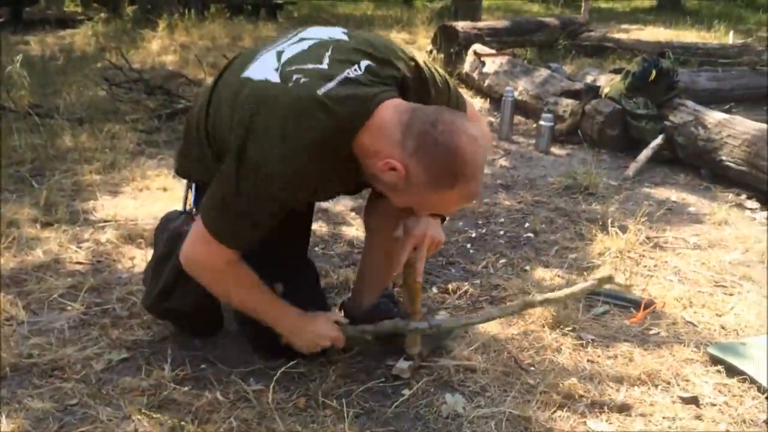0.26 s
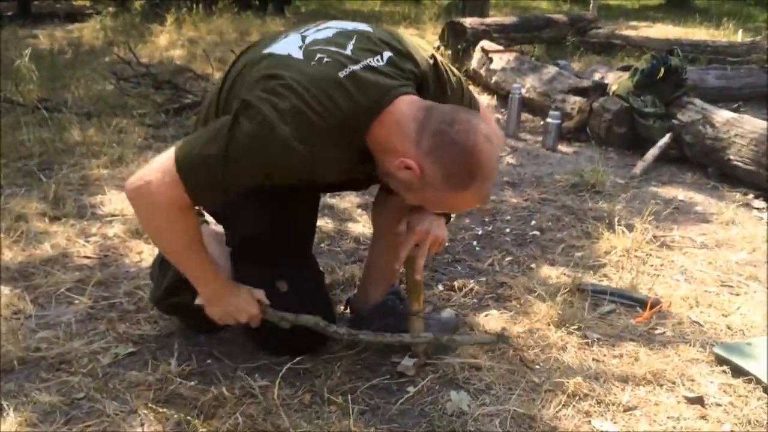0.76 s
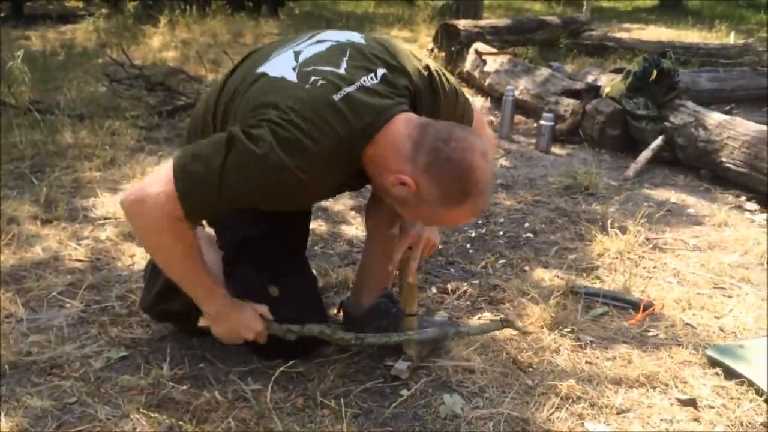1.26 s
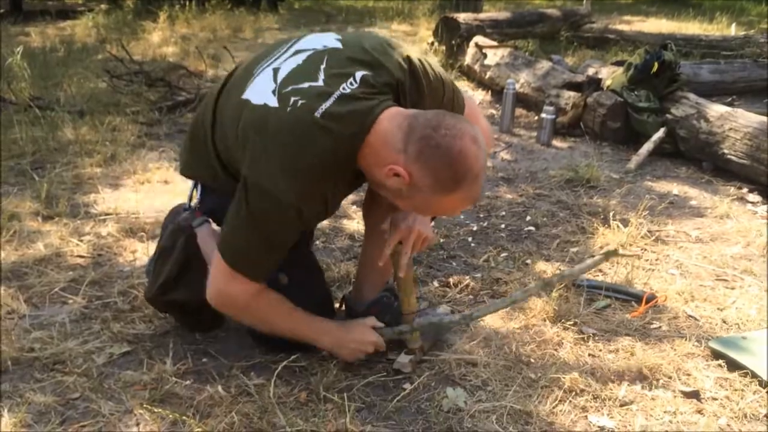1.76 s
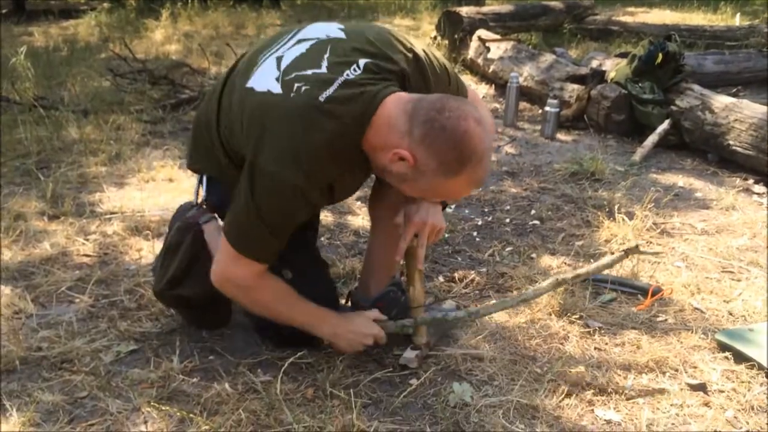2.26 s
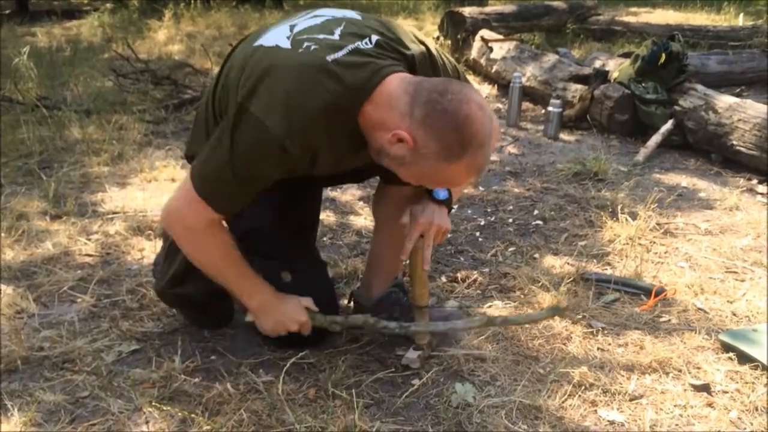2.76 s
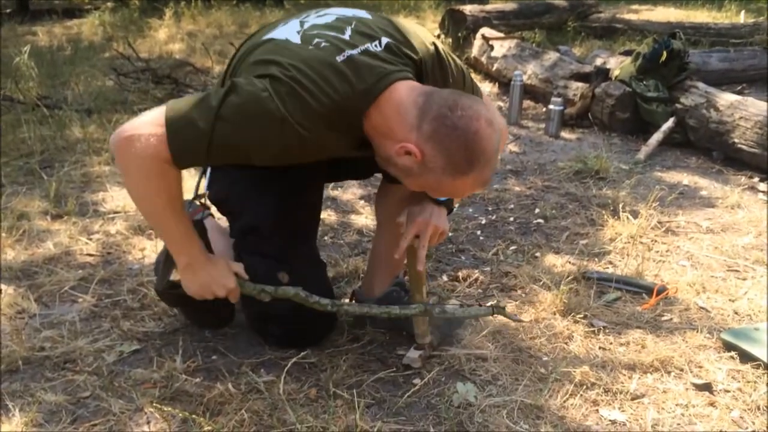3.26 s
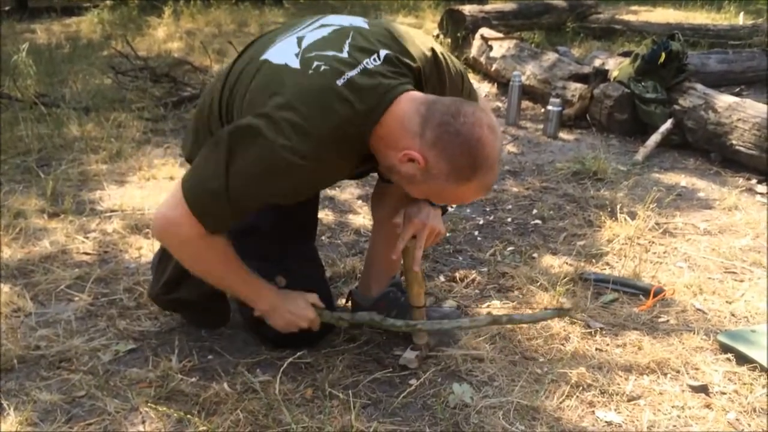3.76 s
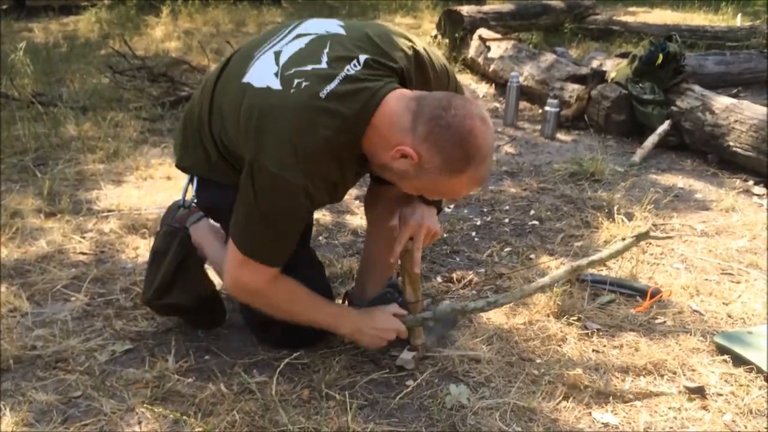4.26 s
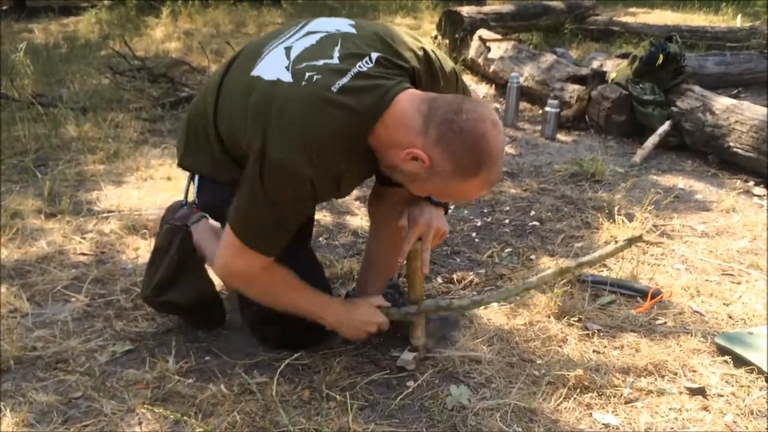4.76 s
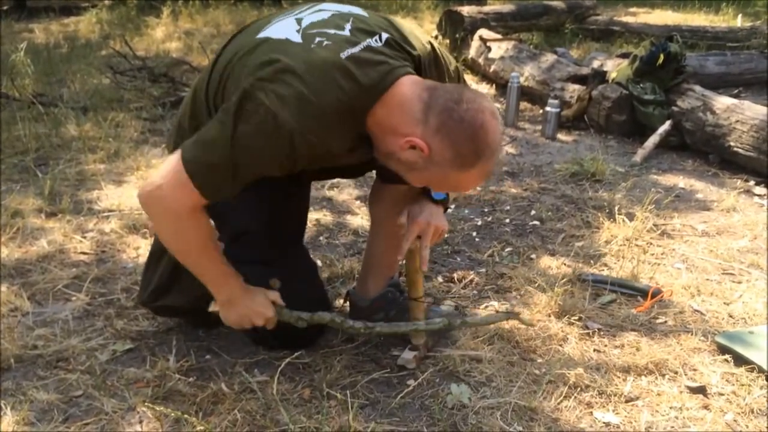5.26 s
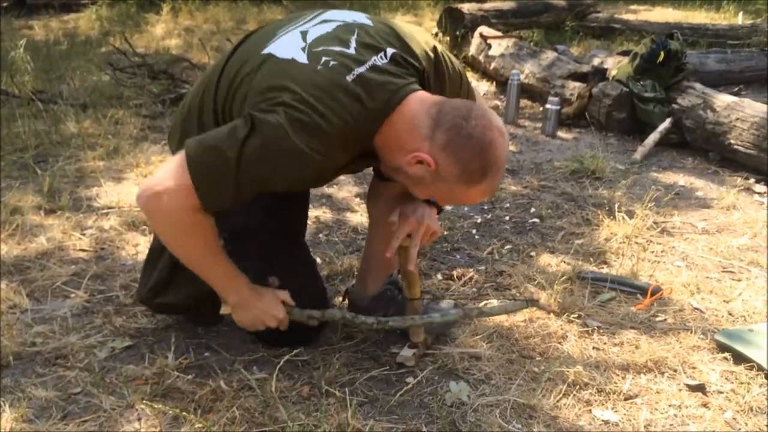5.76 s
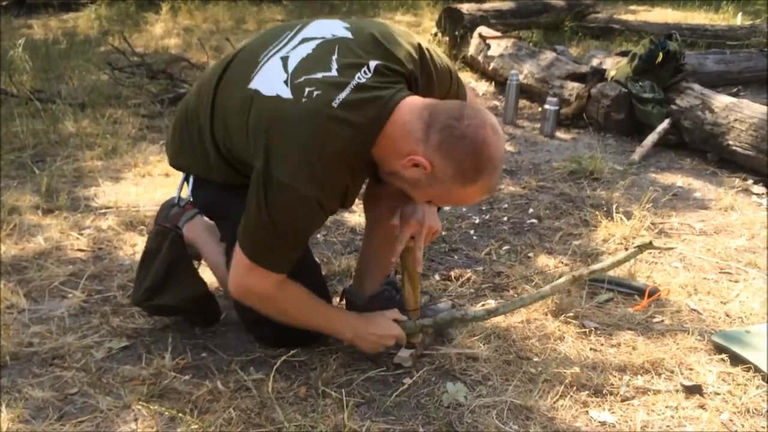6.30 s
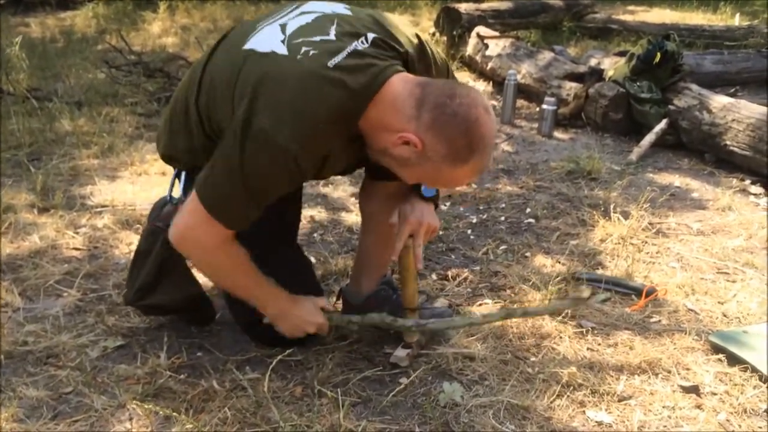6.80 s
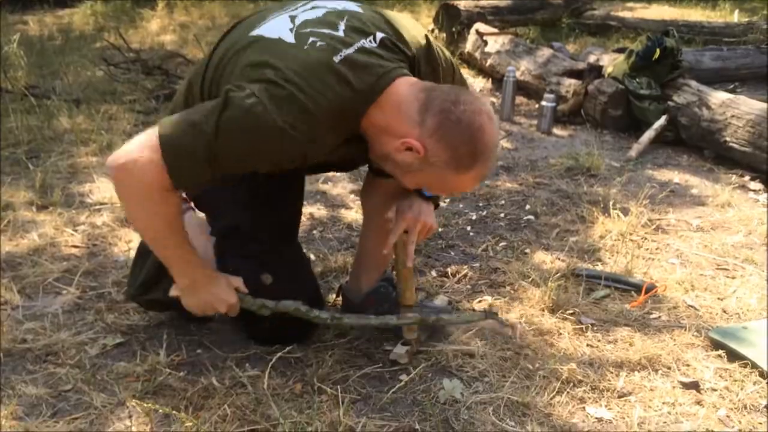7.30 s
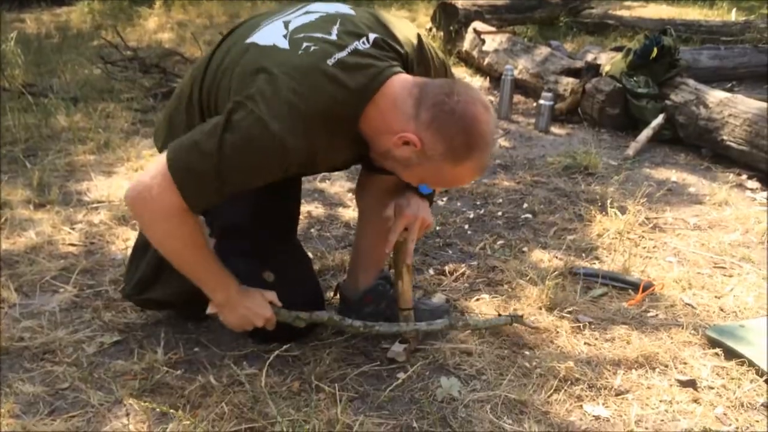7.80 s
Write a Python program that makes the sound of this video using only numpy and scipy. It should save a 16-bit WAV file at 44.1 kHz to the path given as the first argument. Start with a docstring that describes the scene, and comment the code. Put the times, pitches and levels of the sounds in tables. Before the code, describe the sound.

Fast, steady bow-drill strokes rub dry wood on wood, giving harsh short squeaks, gritty rasping and dull socket knocks in a quiet outdoor clearing.

```python
"""Wood grinds and squeaks in quick back-and-forth strokes: a bow drill is worked on dry ground outdoors.
Each stroke spins a wooden spindle in the socket of a hearth board; random fibre slips grind and ring the wood.
Where it grips, short stick-slip tones squeak and turn harsh, and rough squeals sound on higher modes.
Ringing modes make the knocks in the socket; short noise bursts make the ticks of dry wood.
The strokes stop just before the end, leaving soft air noise and a low distant hum."""
import sys
import numpy as np
from scipy import signal
from scipy.fft import rfft, irfft
from scipy.io import wavfile
from scipy.ndimage import uniform_filter1d, minimum_filter1d

SR = 44100
rng = np.random.default_rng(int(sys.argv[2]) if len(sys.argv) > 2 else 0)


def to_wav(s):
    """Save 16-bit WAV."""
    ch = np.atleast_2d(s).T  # columns
    pcm = np.round(np.clip(ch, -1, 1) * 32767)  # PCM
    wavfile.write(sys.argv[1], SR, pcm.astype(np.int16))


N = 354606
TIME = np.arange(N) / SR

# bow strokes, pull and push in turn, each lasting until the next; the level is before the grit boost:
# (start [s], grinding level [dB])
BOW_STROKES = [(-0.04, -43.5), (0.142, -41.5), (0.338, -43), (0.545, -41.5), (0.748, -46.5), (0.955, -43.5),
               (1.147, -50), (1.362, -42), (1.558, -45), (1.769, -43.5), (1.965, -43.5), (2.171, -43.5),
               (2.378, -44.5), (2.604, -44), (2.803, -40), (3.014, -43.5), (3.203, -40.5), (3.411, -43.5),
               (3.61, -43), (3.826, -41), (4.028, -44), (4.246, -43), (4.442, -44.5), (4.672, -38.5),
               (4.863, -44.5), (5.085, -42), (5.272, -43), (5.476, -43.5), (5.671, -43.5), (5.864, -44),
               (6.065, -45.5), (6.281, -44.5), (6.463, -42.5), (6.674, -45.5), (6.862, -43), (7.058, -47.5),
               (7.242, -45), (7.46, -49), (7.552, -52.5), (7.665, -49.5)]
# the spindle grips and squeaks; length is at half height, overtones are relative to the squeak:
# (middle [s], level [dB], length [s], rough pitch [Hz], overtones before trim [dB])
GRIPPING_SQUEAKS = [(0.075, -23.5, 0.0041, 1035, 5), (0.219, -18, .016, 1075, -21.5),
                    (0.251, -15, .011, 1158, -8.5), (0.263, -9.5, 0.0097, 1036, -4.5),
                    (0.279, -17.5, .023, 1099, -8.5), (0.404, -34, .026, 971, -8),
                    (0.661, -14.5, 0.016, 1074, -9), (0.675, -13.5, .01, 1022, -8),
                    (0.683, -10, .011, 1133, -7.5), (0.707, -23.5, .018, 1135, -18),
                    (0.798, -15.5, 0.016, 1025, -3.5), (0.849, -18, .013, 1050, -4.5),
                    (1.019, -20, .017, 1105, -15.5), (1.035, -5.5, 0.0045, 1079, -9),
                    (1.047, -9.5, 0.018, 1110, -5), (1.061, -9.5, .009, 1067, -5),
                    (1.078, -18.5, 0.017, 1097, -7), (1.194, -19.5, .011, 1045, -15.5),
                    (1.225, -33, .012, 787, -2), (1.248, -30, 0.013, 986, 2.5), (1.272, -35, .012, 774, -1),
                    (1.459, -12.5, 0.012, 1159, -8), (1.471, -10.5, 0.0092, 1030, 1),
                    (1.492, -12.5, .013, 1107, -6.5), (1.515, -18, .018, 1105, -14),
                    (1.858, -21.5, .017, 1074, -25), (2.063, -21.5, 0.026, 1042, -2),
                    (2.279, -30.5, .016, 1077, -3), (2.429, -23.5, .015, 1006, -30),
                    (2.458, -18.5, .01, 915, -0.5), (2.485, -21, 0.012, 942, 2),
                    (2.511, -27.5, 0.0085, 1023, -7.5), (2.853, -19, .012, 903.4, -0.5),
                    (2.875, -20, .013, 933, -13.5), (2.901, -18, .02, 983, 1.5),
                    (2.922, -19, 0.0093, 1074, 2), (2.972, -21, .014, 1070, -10),
                    (2.987, -25, .013, 1085, -11), (3.103, -22, .007, 1009, -9.5),
                    (3.683, -26, .013, 898.6, -10), (3.72, -21.5, 0.015, 991, 0.5),
                    (3.738, -19.5, 0.018, 952, 2.5), (4.089, -34, .016, 816.4, -18),
                    (4.146, -19.5, .015, 928, 2), (4.334, -26, .014, 1060, -16),
                    (4.357, -23, .012, 1071, -25.5), (4.485, -28.5, .02, 922, -9),
                    (4.501, -12, .009, 934, -2), (4.793, -12, 0.019, 1129, -12),
                    (4.81, -10.5, .007, 1138, -6), (4.923, -24, .012, 1027, -16.5),
                    (4.951, -19, 0.0041, 1028, -20), (4.976, -19.5, 0.019, 1005, 0),
                    (5.436, -27, 0.023, 1185, -25.5), (5.607, -19.5, .024, 1150, -17.5),
                    (5.63, -17.5, 0.013, 1078, -7.5), (5.726, -12.5, .012, 955, 3.5),
                    (5.787, -22, .011, 1031, 3), (5.959, -26, .028, 1205, -7),
                    (5.975, -16.5, .012, 1102, -9.5), (6.112, -13.5, .013, 1073, -1.5),
                    (6.165, -24.5, .022, 969, .5), (6.186, -23.5, .014, 959, 2),
                    (6.233, -27, .017, 1125, -13.5), (6.362, -17.5, .015, 1210, -9),
                    (6.38, -21.5, 0.021, 1060, -6), (6.402, -22.5, 0.0098, 1125, -10.5),
                    (6.524, -14.5, .011, 893, 1.5), (6.545, -23.5, .011, 970, -19),
                    (6.579, -20, 0.023, 950, 0.5), (6.65, -20.5, .01, 1142, -7.5),
                    (6.903, -20.5, 0.0069, 871, -3.5), (6.94, -17, 0.0093, 936, 5),
                    (6.956, -22, .011, 990, 4.5), (6.983, -22.5, 0.013, 858.4, 1),
                    (7.007, -23.5, .018, 1000, 2.5), (7.313, -14, 0.011, 1028, -7.5),
                    (7.334, -27, .022, 937, -16), (7.386, -23.5, 0.029, 1030, 0),
                    (7.423, -10.5, 0.0084, 1153, -5.5), (7.774, -27.5, 0.0061, 952, -10)]
# brief squeals on the upper modes of the spindle: (middle [s], level [dB], length at half height [s], pitch [Hz])
UPPER_SQUEALS = [(0.265, -19, .0066, 3080), (0.425, -29, .012, 2930), (1.059, -19, .007, 3040),
                 (1.43, -29.5, .014, 2614), (1.659, -28, .012, 2500), (2.061, -17, 0.0083, 2000),
                 (2.917, -15.5, 0.0068, 2720), (3.346, -28, .016, 2600), (3.537, -24.5, .011, 2500),
                 (3.732, -14.5, .0056, 2500), (5.813, -25, .016, 2470), (6.181, -19, .014, 1850),
                 (6.958, -9, .0051, 2355), (7.185, -29.5, .012, 2600), (7.397, -11.5, 0.0019, 2350),
                 (7.593, -27.5, .013, 2530)]
# the spindle jumps in its socket; levels drive the modes below: (time [s], clack [dB], thud [dB])
SPINDLE_KNOCKS = [(0.1, -21, -24.5), (0.275, -36, -27), (0.498, -23.5, -49), (0.685, -43, -24.5),
                  (0.821, -37, -29), (1.084, -42, -27), (2.033, -24.5, -26), (2.115, -13, -28),
                  (2.2, -32, -28), (2.289, -23, -28.5), (2.313, -22, -25), (2.484, -11, -31),
                  (2.691, -26, -26), (2.74, -37, -28.5), (2.896, -26, -34), (3.143, -34.5, -27),
                  (3.361, -21, -29), (3.442, -16.5, -22), (3.549, -23.5, -21), (3.559, -17, -21),
                  (3.707, -18.5, -29.5), (3.768, -16, -25.5), (4.121, -23.5, -23.5), (4.368, -28, -26),
                  (4.552, -39, -45), (5.356, -23, -35), (5.993, -25, -20.5), (6.391, -21.5, -20.5),
                  (6.554, -29, -30), (6.794, -27, -27.5), (6.997, -21, -39), (7.178, -32.5, -29.5),
                  (7.428, -15, -25), (7.495, -40, -31.5)]
# sharp ticks of dry wood: (time [s], starting level [dB])
DRY_TICKS = [(1.701, -32.5), (1.755, -31), (2.996, -27), (4.223, -32), (4.976, -29), (6.607, -32.5),
             (7.856, -38.5)]
# resonances of the rubbed spindle and board; the filter widens each by pi/2:
# (centre [Hz], nominal width [Hz], relative level [dB])
WOOD_RESONANCES = [(1105, 241, -2), (2510, 227, -2.5), (2770, 330, -11), (3670, 230, -18.5),
                   (4560, 230, -14.5), (7170, 570, -29.5), (9860, 450, -35)]
# modes of the struck board: (frequency [Hz], relative level [dB], time to fall 60 dB [s])
BOARD_MODES = [(558, -8.5, 0.034), (720, -3, 0.034), (1307, 3.5, 0.013), (1574, 1.5, 0.0055),
               (2720, -7, 0.016)]
# modes of the board on the soil: (frequency [Hz], relative level [dB], time to fall 60 dB [s])
SOIL_MODES = [(104, -13, 0.11), (160.2, -5, 0.083), (209.6, -4, 0.037), (306, -9.5, 0.028)]
# tone colour of the grinding: (frequency [Hz], relative level [dB])
GRIND_SPECTRUM = [(25, -15), (50, 0.5), (190, 5.5), (400, -3.5), (700, 5), (1100, -3), (1600, 4.5),
                  (2600, 1.5), (3400, -0.5), (4600, 0), (5600, -10.5), (7200, -19), (8600, -28),
                  (10000, -27), (12000, -38), (15500, -37)]
# tone colour of the outdoor air: (frequency [Hz], relative level [dB])
AIR_SPECTRUM = [(25, -23), (55, 1), (130, 0), (200, -2), (280, -11), (500, -11), (1100, -15), (2400, -14),
                (4500, -25), (9000, -35), (15000, -42)]
# how strongly the wood radiates the overtones of a squeak: (frequency [Hz], relative level [dB])
OVERTONE_RADIATION = [(1500, 1), (1900, -0.5), (2400, 0), (2800, -9.5), (3300, -19), (4500, -20),
                      (5300, -34.5), (7000, -51)]
# tone colour of a dry tick: (frequency [Hz], relative level [dB])
TICK_SPECTRUM = [(300, -12), (1500, -3), (4000, 0), (7000, -13), (15000, -26)]

STOP_S = 7.877   # the last stroke ends
PULL_FASTEST, PUSH_FASTEST = 0.53, 0.45   # share of the stroke at which the bow is fastest
USUAL_GRIND_DB = -43
# ring of the wood in a usual stroke, and the share of the grinding's swing that it follows
PULL_RING_DB, PUSH_RING_DB, RING_FOLLOWS = -37, -37.5, 0.82
# average change of pitch over the length of a squeak, and its random spread
PULL_GLIDE_HZ, PUSH_GLIDE_HZ, GLIDE_SPREAD_HZ = -34.5, 70.7, 90
CHIRP_OVER_GRIND_DB, CHIRP_SPREAD_DB, CHIRP_OVERTONES_DB = 7.0, 1.5, -3.0
CHIRP_LENGTH_S, CHIRP_REACH = .016, .27   # reach: share of the stroke on either side of its middle
PULL_CHIRP_HZ, PUSH_CHIRP_HZ = 1001, 1089.6   # average pitch mid-stroke
CHIRP_CLIMB_HZ, CHIRP_SCATTER_HZ = 199.8, 59.95   # climb per whole stroke, and random spread
AIR_DB, HUM_HZ, HUM_DB = -56, 95.6, -52.5
CUTOFF_HZ = 15500


def from_db(db):
    """Turn decibels into a gain."""
    return 10 ** (np.asarray(db) / 20)


def rms_one(x):
    """Scale a sound to unit power."""
    return x / np.sqrt(np.mean(x ** 2) + 1e-20)


def drift(rate):
    """Smooth random wandering of spread 1; a higher rate [Hz] wanders faster."""
    r = np.exp(-2 * np.pi * rate / SR)
    noise = rng.standard_normal(N + SR)
    return rms_one(signal.lfilter([1], [1, -2 * r, r * r], noise)[SR:])   # the first second settles the filter


def coloured(x, spectrum):
    """Give a sound a smooth tone colour and unit power."""
    hz, db = np.transpose(spectrum)
    bins = np.maximum(np.fft.rfftfreq(N, 1 / SR), 1)
    gain = from_db(np.interp(np.log(bins), np.log(hz), db))
    return rms_one(irfft(rfft(x) * gain, N))


def resonate(x, hz, width_hz):
    """Ring a resonance whose centre may move, at unit power."""
    turn = np.exp(2j * np.pi * np.cumsum(hz * np.ones(N)) / SR)
    r = np.exp(-np.pi * width_hz * np.pi / 2 / SR)
    # shift the centre down to zero, smooth there, then shift back
    return rms_one((turn * signal.lfilter([1], [1, -2 * r, r * r], x / turn)).real)


def swell(middle, length):
    """Samples around a squeak, their time in squeak lengths, and its rise and fall."""
    first = max(int((middle - 2 * length) * SR), 0)
    last = min(int((middle + 2 * length) * SR), N)
    at = np.arange(first, last)
    u = (TIME[at] - middle) / length
    return at, u, 2 ** -(2 * u) ** 2


def grains(per_s, spread_db):
    """Tiny slips of wood fibre, at random times and of uneven size."""
    sizes = from_db(spread_db * np.minimum(rng.exponential(1, N), 4)) * rng.choice([-1, 1], N)
    return sizes * (rng.random(N) < per_s / SR)


def strokes():
    """List each stroke as (start [s], end [s], grinding level [dB], whether it is a push)."""
    ends = [start for start, _ in BOW_STROKES[1:]] + [STOP_S]
    rows = []
    for k, ((start, db), end) in enumerate(zip(BOW_STROKES, ends)):
        rows.append((start, end, db, k % 2 == 1))
    return rows


def grinding(grit_db=5.0, grit_flutter_db=2.5, ring_flutter_db=2.0, push_bend=-0.1, pull_rise=0.13,
             wander=0.038, crackle_db=-7.0, catch_db=4.0):
    """Friction follows the speed of the bow and dies at each turn; the load bends the lowest resonance."""
    grit, ring, bend = np.zeros(N), np.zeros(N), np.zeros(N)
    for start, end, db, push in strokes():
        fastest = start + (end - start) * (PUSH_FASTEST if push else PULL_FASTEST)
        wood_db = (PUSH_RING_DB if push else PULL_RING_DB) + RING_FOLLOWS * (db - USUAL_GRIND_DB)
        at = (TIME > start) & (TIME < end)
        progress = np.interp(TIME[at], [start, fastest, end], [0, .5, 1])
        speed = np.abs(np.sin(np.pi * progress))
        grit[at] += from_db(db) * speed ** 1.4
        ring[at] += from_db(wood_db) * speed ** 1.3
        bend[at] = push_bend * (speed - 1.5) if push else pull_rise * (progress - .7)
    slips, grip = grains(per_s=13000, spread_db=1.5), drift(49)
    # coarser crumbs of wood dust
    crackle = from_db(crackle_db) * coloured(grains(per_s=550, spread_db=2.5), GRIND_SPECTRUM)
    rasp = (coloured(slips, GRIND_SPECTRUM) + crackle) * from_db(grit_flutter_db * grip + grit_db)
    tones = np.zeros(N)
    for k, (hz, width, db) in enumerate(WOOD_RESONANCES):
        centre = hz * (1 + (k == 0) * bend + wander * drift(23))
        catch = from_db(db + catch_db * drift(15.4))   # each catches and lets go on its own
        tones += catch * resonate(slips, centre, width)
    return grit * rasp + ring * tones * from_db(ring_flutter_db * grip)


def chirps(count=2):
    """Faint squeaks at random moments near mid-stroke, following its grinding; rows as in GRIPPING_SQUEAKS."""
    rows = []
    for start, end, db, push in strokes():
        for part in range(count):
            off_middle = CHIRP_REACH * (2 * (part + rng.random()) / count - 1)
            middle = start + (.5 + off_middle) * (end - start)
            level_db = db + CHIRP_OVER_GRIND_DB + CHIRP_SPREAD_DB * rng.standard_normal()
            hz = PUSH_CHIRP_HZ if push else PULL_CHIRP_HZ
            hz += CHIRP_CLIMB_HZ * off_middle + CHIRP_SCATTER_HZ * rng.standard_normal()
            rows.append((middle, level_db, CHIRP_LENGTH_S, hz, CHIRP_OVERTONES_DB))
    return rows


def glide_at(s):
    """Squeaks tend to rise on a push and to sink on a pull, each by its own amount."""
    pushing = any(push and start <= s < end for start, end, _, push in strokes())
    return (PUSH_GLIDE_HZ if pushing else PULL_GLIDE_HZ) + GLIDE_SPREAD_HZ * rng.standard_normal()


def squeaks(overtone_db=-3.0, sag=0.05, jitter=0.01311, harsh_jitter=0.0594, shimmer_db=0.9,
            harsh_shimmer_db=1.0, overtone_shimmer_db=4.0, scrape_db=-29, burr_db=-12, highest_harmonic=6):
    """Stick-slip near the lowest mode; harder grip flattens the pitch, adds overtones and roughens the cycle."""
    # squeaks that overlap share one tone, its pitch weighted by their power
    power, overtone_power = np.full(N, 1e-12), np.zeros(N)
    pitch = np.full(N, 1e-12 * WOOD_RESONANCES[0][0])
    for middle, db, length, hz, bright_db in list(GRIPPING_SQUEAKS) + chirps():
        at, u, height = swell(middle, length)
        share = (from_db(db) * height) ** 2
        glide = glide_at(middle) * np.clip(u, -.7, .7)
        power[at] += share
        pitch[at] += share * (hz * (1 + sag * (.8 - height)) + glide)
        overtone_power[at] += share * from_db(bright_db) ** 2 * height
    level, bright = np.sqrt(power), np.sqrt(overtone_power)
    harsh = np.minimum(bright / level, 1) ** 1.417
    unrest = (jitter + harsh_jitter * harsh) * drift(239.0)
    pitch = np.maximum(pitch / power * (1 + unrest), 1)
    phase = 2 * np.pi * np.cumsum(pitch) / SR
    wave = level * np.sin(phase) * from_db((shimmer_db + harsh_shimmer_db * harsh) * drift(110))
    for k in range(2, highest_harmonic + 1):
        radiated_db = np.interp(k * pitch, *np.transpose(OVERTONE_RADIATION))
        strength = from_db(overtone_db + radiated_db + overtone_shimmer_db * drift(150))
        wave += bright * strength * np.cos(k * phase)
    # uneven slips also shake the upper resonance and scrape the socket
    slips = grains(per_s=9000, spread_db=7.5)
    burr = from_db(burr_db) * bright * resonate(slips, hz=2685, width_hz=600)
    scrape = from_db(scrape_db) * (.5 * level + 2 * bright) * coloured(slips, GRIND_SPECTRUM)
    return np.sqrt(2) * wave + burr + scrape


def whistles(jitter=0.034, shimmer_db=1.0):
    """Short squeals on a higher mode, with a shaking pitch and level."""
    out, wobble, flutter = np.zeros(N), drift(300), drift(280)
    for middle, db, length, hz in UPPER_SQUEALS:
        at, _, height = swell(middle, length)
        unrest = jitter * from_db(0.16 * (db + 26.5))   # louder squeals are rougher
        phase = 2 * np.pi * np.cumsum(hz * (1 + unrest * wobble[at])) / SR
        out[at] += from_db(db + shimmer_db * flutter[at]) * height * np.sin(phase)
    return np.sqrt(2) * out


def strike(times, levels_db, modes, spread_db):
    """Each blow rings every mode with a strength of its own, and each mode dies away at its own pace."""
    out = np.zeros(N)
    for k, (hz, db, t60) in enumerate(modes):
        clicks = np.zeros(N) + 1e-18
        blow_db = levels_db + db + spread_db * rng.standard_normal(len(times))
        clicks[(times * SR).astype(int)] = from_db(blow_db)
        r, w = from_db(-60 / (t60 * SR)), 2 * np.pi * hz / SR
        ringing = signal.lfilter([0, np.sin(w)], [1, -2 * r * np.cos(w), r * r], clicks)
        out += (-1) ** k * ringing
    return out


def knocks():
    """The jumping spindle makes the board clack and thump on the soil."""
    times, clack_db, thud_db = np.transpose(SPINDLE_KNOCKS)
    clacks = strike(times, clack_db, BOARD_MODES, spread_db=2.0)
    thuds = strike(times, thud_db, SOIL_MODES, spread_db=2.0)
    return signal.sosfilt(signal.butter(2, 70, "high", fs=SR, output="sos"), clacks + thuds)


def ticks(decay_s=0.0029):
    """Dry wood snaps with a brief bright crack: noise that starts at once and dies away."""
    level = np.zeros(N)
    for s, db in DRY_TICKS:
        level[int(s * SR)] = from_db(db)
    level = signal.lfilter([1], [1, -np.exp(-1 / (decay_s * SR))], level + 1e-18)
    return level * coloured(rng.standard_normal(N), TICK_SPECTRUM)


def clearing(x, echo_db=-33, t60=0.18):
    """Logs and trees scatter back a faint, dull tail."""
    t = TIME[:SR // 2]
    tail = rng.standard_normal(len(t)) * from_db(-60 * t / t60) * (t > .008)
    tail = signal.sosfilt(signal.butter(2, 3000, fs=SR, output="sos"), tail)
    echo = signal.fftconvolve(x, tail / np.linalg.norm(tail))[:N]
    return x + from_db(echo_db) * echo


def background():
    """Outdoor air as coloured noise, and a distant hum as a tone that wavers in pitch and level."""
    air = from_db(AIR_DB) * coloured(rng.standard_normal(N), AIR_SPECTRUM)
    hum_phase = 2 * np.pi * np.cumsum(HUM_HZ + 3.5 * drift(6)) / SR
    hum = np.sin(hum_phase) * from_db(3.6 * drift(5))
    return air + from_db(HUM_DB) * rms_one(hum)


def scene():
    """The drill with its faint echo, over the outdoor background."""
    drill = grinding() + squeaks() + whistles() + knocks() + ticks()
    return (clearing(drill) + background())[None]


def record(dry, size=88):
    """A fast limiter (window size in samples) holds down the loudest peaks; then the top is cut."""
    room_left = np.minimum(1, .97 / (np.abs(dry) + 1e-9))
    lowest = minimum_filter1d(room_left, size, axis=-1)
    gain = uniform_filter1d(lowest, size, axis=-1)
    return signal.sosfilt(signal.ellip(10, .1, 80, CUTOFF_HZ, fs=SR, output="sos"), dry * gain)


dry = scene()
out = record(dry)
to_wav(out)
```